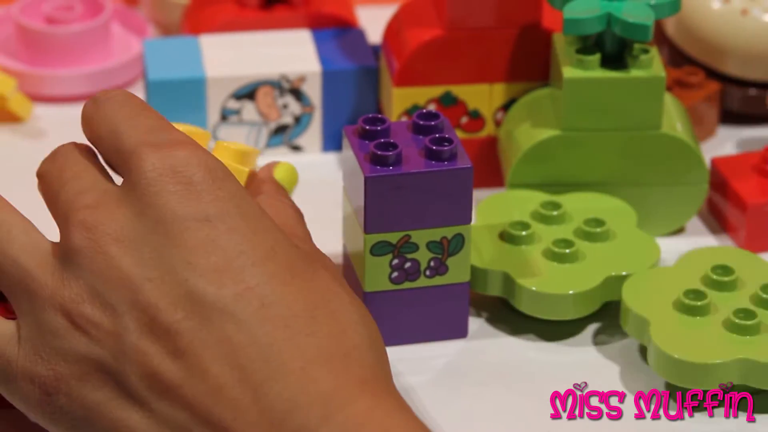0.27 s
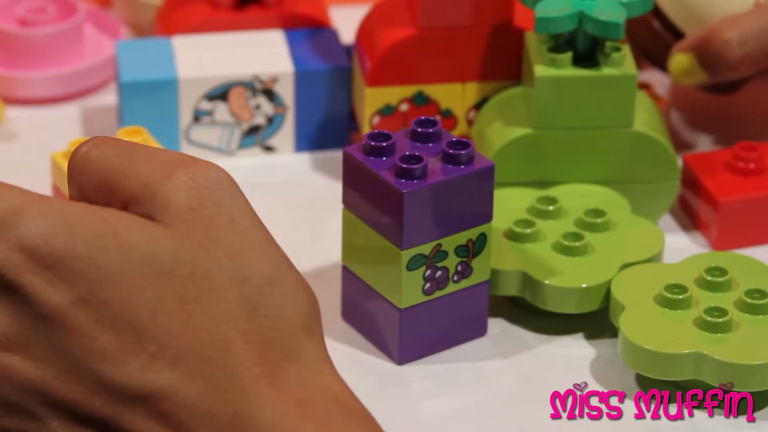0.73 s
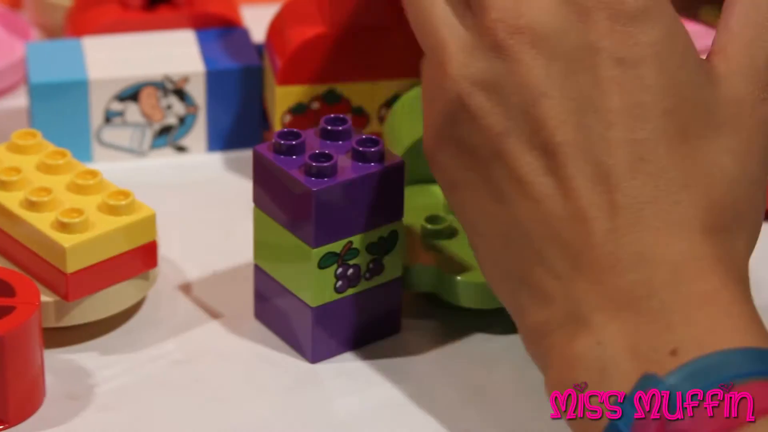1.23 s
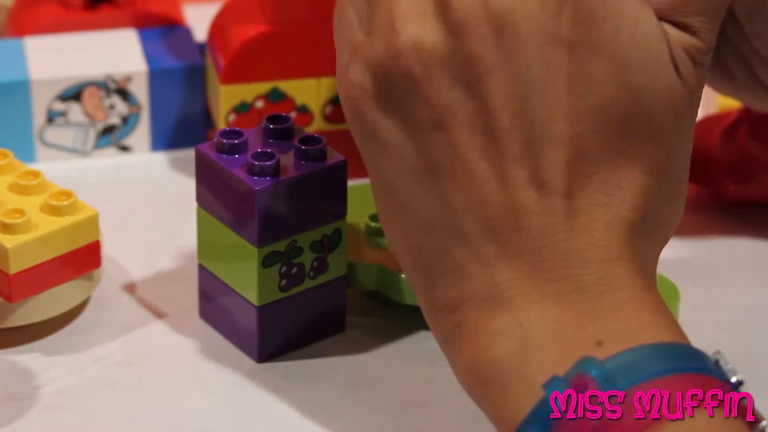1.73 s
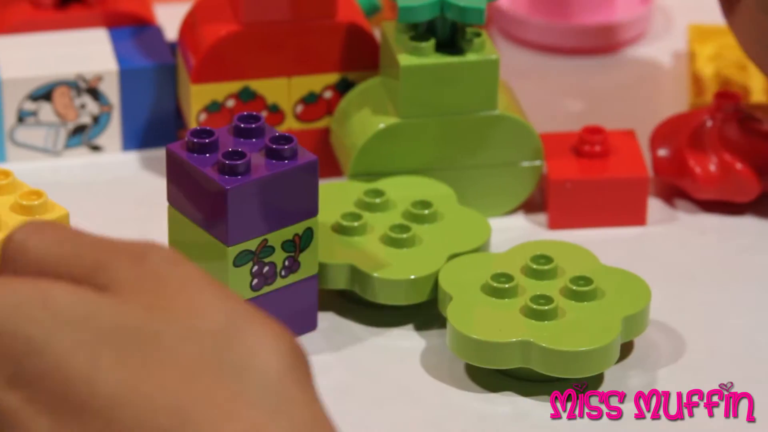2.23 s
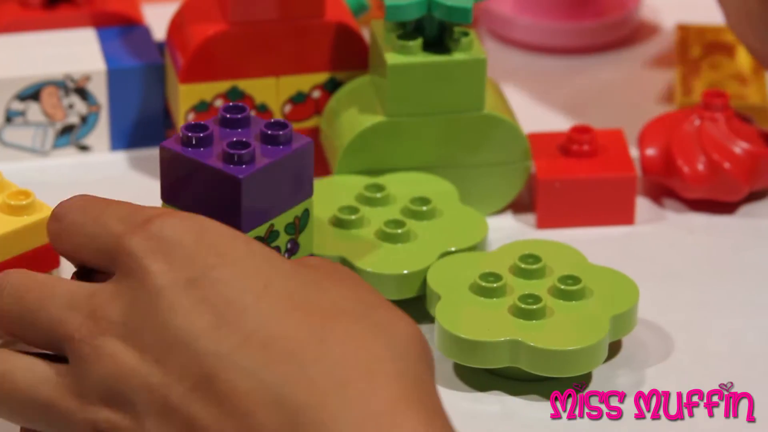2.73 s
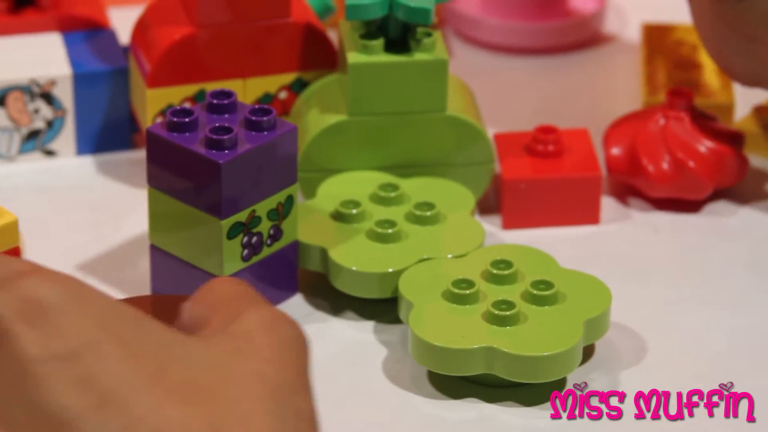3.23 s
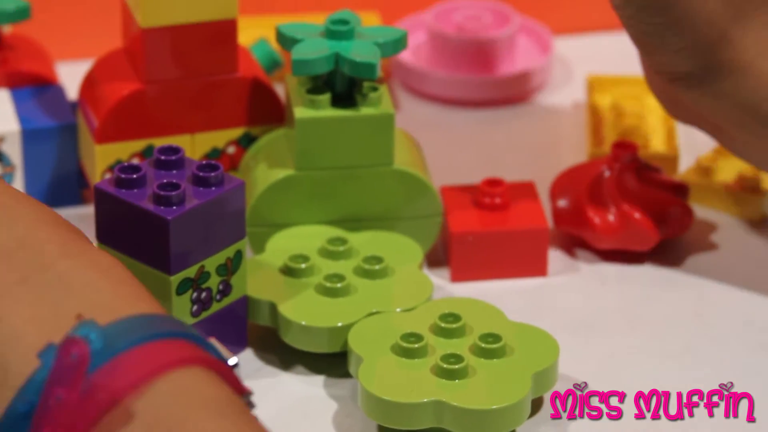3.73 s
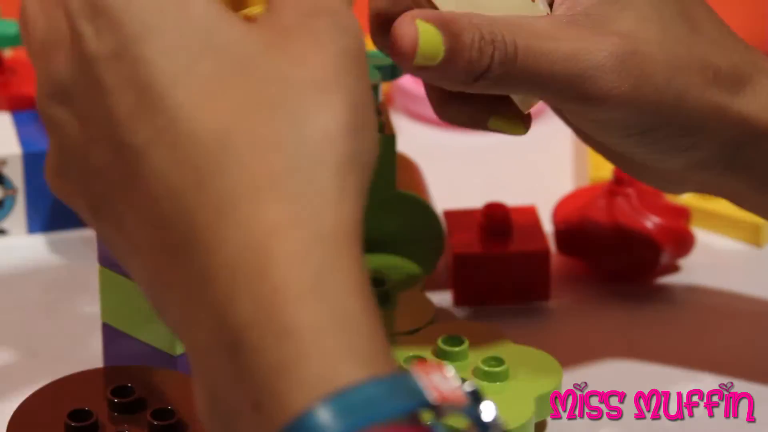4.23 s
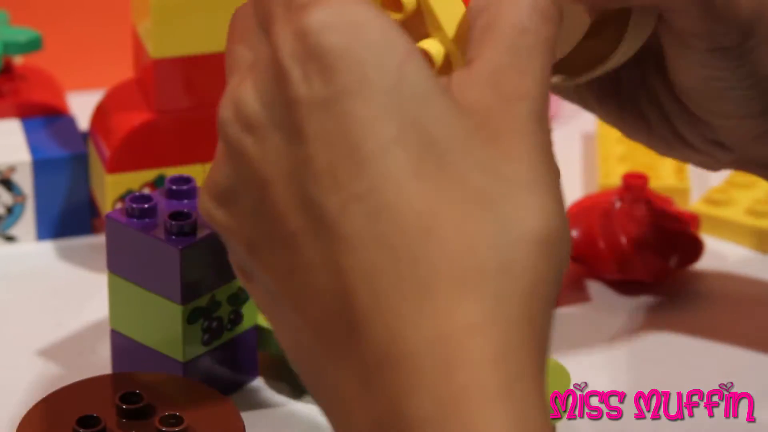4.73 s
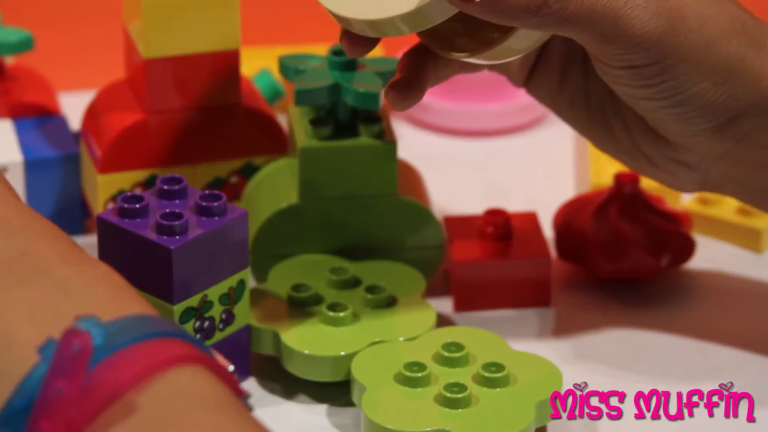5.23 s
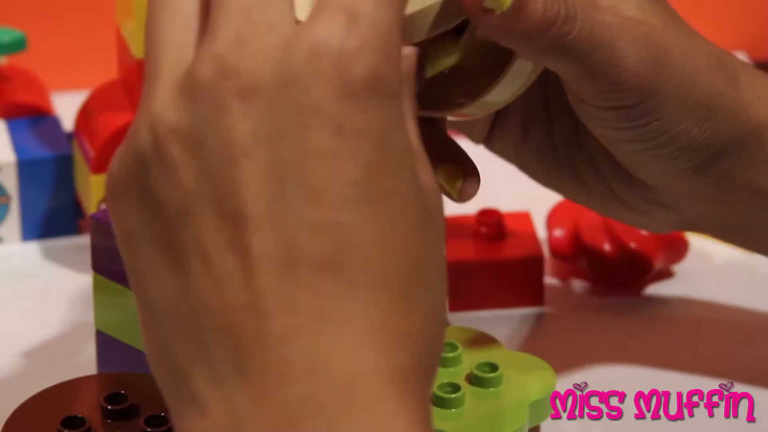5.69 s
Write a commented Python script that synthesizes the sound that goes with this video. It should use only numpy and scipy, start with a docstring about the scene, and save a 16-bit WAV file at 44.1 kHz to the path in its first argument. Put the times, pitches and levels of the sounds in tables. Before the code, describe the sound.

Close to the microphone in a small room, hard plastic toy pieces click and knock on a table. A dense, loud clatter with short scrapes comes first, then a stack is set down, a few isolated brick snaps follow, another burst of flat clicks, quieter fumbling, and finally sharp brick knocks. Low rumble, soft hiss and a very faint high whine continue underneath.

```python
"""Plastic toy pieces on a table, close up

Hands pick up, press together and set down hard plastic pieces close to the microphone, in a small room.
Each knock is a short uneven contact that rings flat plates, hollow bricks, a cup, a stack or the table top.
Sliding pieces are dense random grains through the same bodies; sparse reflections make the room.
Low rumble, microphone hiss and a thin electrical whine lie underneath."""
import sys
import numpy as np
from scipy import signal
from scipy.io import wavfile

SR = 44100
rng = np.random.default_rng(int(sys.argv[2]) if len(sys.argv) > 2 else 0)


def persist_wave(psi):
    """Save psi, clipped to +-1, as 16-bit WAV."""
    counts = np.round(np.clip(psi, -1, 1) * 32767).astype(np.int16)
    wavfile.write(sys.argv[1], SR, np.atleast_2d(counts).T)


N = 262703

# Modes of a flat plate: pitch_hz [Hz], level_db [relative dB], t60_s [s]
PLATE_MODES = [(1772, -3, 0.13), (3000, -1, 0.044), (3300, -2.5, 0.082), (3457, 7.5, 0.032),
               (5563, 0.5, 0.054), (6420, -9.5, 0.068), (11650, 1, 0.031), (12200, -29, .025)]
# Flat plates clicking: start_s [s], crack_db [peak dB], face_hz [Hz, struck face],
# ring_db [peak dB], tick_db [peak dB]
PLATE_CLICKS = [(.0169, -36, 1640, -48, -20.5), (.0574, -29, 1700, -14, -31),
                (.0811, -3.5, 1870, -11, -1.5), (.0931, -14, 1750, -24, -10.5),
                (.1271, -23, 1700, -14.5, -23), (.2458, -19.5, 3800, -23, -22), (.286, -7, 1680, -39, -45),
                (.3154, -23, 1800, -34, -44), (.3284, -30, 5550, -25.5, -30),
                (.4349, -10, 2980, -15.5, -38), (.4577, -30, 5660, -23.5, -29),
                (.4748, -16, 1900, -15.5, -37), (.499, -25, 1750, -30, -27), (.5115, -21.5, 3020, -45, -38),
                (.5465, -17, 3710, -23, -47), (.6626, -22.5, 3130, -28, -24), (.7193, -27, 3160, -33, -30),
                (2.6563, -29, 3140, -29, -35), (2.6728, -11, 3240, -16, -38),
                (2.7066, -20, 3280, -10.5, -19), (2.7304, -9.5, 2000, -9.5, -20.5),
                (2.7523, -17, 1860, -20, -17.5), (2.8087, -22, 1740, -27, -39),
                (2.8494, -28, 1690, -49, -32), (2.8754, -24.5, 1650, -44, -33),
                (2.918, -20.5, 1970, -30, -30), (2.944, -32, 3530, -38, -45),
                (3.0249, -21, 1840, -27, -25.5), (3.0669, -32, 1640, -44, -42),
                (3.8302, -23.5, 3420, -46, -31.5)]


def plate_clicks():
    """Flat plates ring after a short contact and pass part of each knock on to the table."""
    return clicks(PLATE_CLICKS, PLATE_MODES, fall_db=5.0, ring_ms=0.86, firm=6.8, crack_firm=0.28, under_db=-19)


# Modes of a hollow brick: pitch_hz [Hz], level_db [relative dB], t60_s [s]
BRICK_MODES = [(1580, -20, 0.038), (1723, 11, 0.019), (2850, 4, 0.043), (3270, 3.5, 0.012),
               (4310, 3, 0.044), (4850, 2, 0.049), (7440, -7, 0.042)]
# Hollow bricks clicking: start_s [s], crack_db [peak dB], face_hz [Hz, struck face],
# ring_db [peak dB], tick_db [peak dB]
BRICK_CLICKS = [(1.6973, -2.5, 1880, -6.5, -12.5), (1.7004, -7, 4460, -6, -29),
                (1.7758, -2.5, 3070, -22, -42), (1.8233, -28, 5040, -48, -46),
                (2.0214, -26.5, 1500, -59, -56), (3.1792, -30, 1910, -28, -21.5),
                (3.2125, -33, 1480, -48, -26), (3.256, -33, 1600, -55, -39), (3.354, -28, 1490, -37, -32),
                (3.3807, -32, 3180, -32, -30), (3.5981, -40, 2380, -29.5, -48),
                (3.6411, -31, 2400, -36, -47), (4.69, -25, 1890, -39, -24), (4.7106, -7, 2030, -3, -31),
                (4.7711, -11, 4710, -2.5, -6.5), (5.1398, -32, 4900, -31.5, -55),
                (5.3001, -27.5, 2260, -55, -26), (5.3642, -9.5, 3080, -17, -6.5)]


def brick_clicks():
    """Hollow bricks ring after a very brief contact."""
    return shell_clicks(BRICK_CLICKS, BRICK_MODES)


# Modes of a round cup-shaped piece: pitch_hz [Hz], level_db [relative dB], t60_s [s]
CUP_MODES = [(1523, -1, 0.063), (2610, 0, 0.062), (4000, 3, 0.053), (4760, 6, 0.046)]
# The cup clicking: start_s [s], crack_db [peak dB], face_hz [Hz, struck face],
# ring_db [peak dB], tick_db [peak dB]
CUP_CLICKS = [(4.2922, -29, 2620, -20, -11), (4.3867, -19.5, 2860, -26, -29), (4.3971, -15, 3010, -37, -21),
              (4.4526, -21.5, 1490, -36, -47), (5.656, -22, 4550, -29, -30),
              (5.6993, -18, 4200, -22, -11.5), (5.7604, -36, 4660, -33, -41), (5.9189, -35, 2600, -39, -60),
              (5.9544, -26.5, 1800, -47, -48)]


def cup_clicks():
    """A round cup-shaped piece rings at its own few modes."""
    return shell_clicks(CUP_CLICKS, CUP_MODES)


# Modes of a stack of pieces: pitch_hz [Hz], level_db [relative dB], t60_s [s]
STACK_MODES = [(1260, -4, .05), (2230, -2.5, 0.089), (3363, 7.5, .035), (4140, -14, 0.076),
               (4710, 7.5, 0.027), (5700, -3, 0.045), (6050, -10, .03), (6840, -9, 0.033)]
# The stack clicking as it is set down: start_s [s], crack_db [peak dB], face_hz [Hz, struck face],
# ring_db [peak dB], tick_db [peak dB]
STACK_CLICKS = [(1.2517, -35, 3190, -34.5, -45), (1.29, -16, 1290, -20.5, -19),
                (1.3144, -8, 3570, -29, -22), (1.3191, -12.5, 3470, -1.5, -11.5),
                (1.3394, -15, 1240, -19, -40), (1.3962, -40, 3400, -38, -50)]


def stack_clicks():
    """A stack of pieces rings as it is set down."""
    return shell_clicks(STACK_CLICKS, STACK_MODES)


def shell_clicks(rows, modes):
    """Bricks, cup and stack share one very brief contact."""
    return clicks(rows, modes, fall_db=2.9, ring_ms=0.09, firm=4.3, crack_firm=1.2)


# Spectrum of the crack of a struck face: pitch_hz [Hz], level_db [relative dB]
CRACK = [(500, -15), (1000, -4.5), (1600, -1), (2600, -5.5), (4500, -10.5), (7000, -27), (9000, -22.5)]
# Spectrum of the bright tick of a contact: pitch_hz [Hz], level_db [relative dB]
TICK = [(4000, 7.5), (6500, 8), (8500, 3.5), (12000, 10), (15000, 2.5), (16200, 6)]
CRACK_MS, TICK_MS, THUD_MS = 1.98, 1.26, 1.33  # fade time constants of the contacts
UNDER_HZ = 930  # pitch of the table spot that a clicking plate nudges


def clicks(rows, modes, fall_db, ring_ms, firm, crack_firm, under_db=-np.inf):
    """Each click cracks on the struck face, rings the piece and ticks; under_db lets it nudge the table."""
    out, tick, under = np.zeros(N), colour(TICK), thud_body(UNDER_HZ)
    chatters = rng.standard_normal((len(rows), 4, 900))
    for (start_s, crack_db, face_hz, ring_db, tick_db), (a, b, c, d) in zip(rows, chatters):
        # the crack loses 3.3 dB per octave away from the face's pitch
        near_face = [(hz, db - 3.3 * abs(np.log2(hz / face_hz))) for hz, db in CRACK]
        crack = peaked(colour(near_face))
        # the struck wall is damped by the fingers
        face = crack + 0.71 * ring([(face_hz, 0, .01)])[:len(crack)]
        parts = [
            (contact(a, CRACK_MS, 0.25, crack_firm), face, crack_db),
            (contact(b, ring_ms, 0.9, firm), ring(modes, face_hz, fall_db), ring_db),
            (contact(c, TICK_MS, 1.0, 0.13), tick, tick_db),
            (contact(d, THUD_MS, 3.3, 1.0), under, crack_db + under_db)]
        for push, body, peak_db in parts:
            add(out, start_s, gain_of(peak_db) * peaked(signal.fftconvolve(push, body)))
    return out


# The table top thudding under a piece: start_s [s], level_db [peak dB], pitch_hz [Hz, struck spot]
THUDS = [(.0169, -24, 950), (.0574, -29, 640), (.0931, -13, 630), (.1271, -31, 649), (.1616, -13.5, 453),
         (.2458, -13.5, 710), (.286, 3, 906), (.3154, -10.5, 1050), (.4349, -16.5, 1070),
         (.5115, -19.5, 690), (.635, -31.5, 695), (.6626, -8.5, 590), (.7193, -5.5, 610),
         (1.2517, -24, 464), (1.29, -27, 235), (1.3191, -20, 1090), (1.3394, -19.5, 234),
         (1.3962, -17.5, 690), (2.6728, -20.5, 735), (2.7066, -22.5, 1210), (2.7304, -21, 1130),
         (3.1792, -23, 850), (3.3108, -25.5, 334), (3.354, -30.5, 760), (3.3807, -34, 876),
         (3.4018, -31, 790), (3.5981, -20, 434), (3.6411, -14.5, 436), (3.7536, -22.5, 367),
         (3.7712, -30, 218), (3.8302, -20.5, 445), (4.2922, -30, 380), (4.3867, -31, 840),
         (4.4526, -34, 940), (4.7106, -12.5, 815), (4.7711, -14.5, 633), (5.3001, -15.5, 960),
         (5.3642, -1.5, 897), (5.9544, -29, 640)]


def table_thuds():
    """A piece lands and the table top answers at the struck spot."""
    out = np.zeros(N)
    for (start_s, peak_db, spot_hz), chatter in zip(THUDS, rng.standard_normal((len(THUDS), 3000))):
        push = contact(chatter, THUD_MS, 1.61, 6.8)
        add(out, start_s, gain_of(peak_db) * peaked(signal.fftconvolve(push, thud_body(spot_hz))))
    return out


def loose_shudders():
    """With each thud, loose pieces shake on the table: a longer chatter through three short modes."""
    shudder_ms, shudder_db = 9.2, -16  # fade time constant; peak against the thud
    out = np.zeros(N)
    for (start_s, peak_db, spot_hz), chatter in zip(THUDS, rng.standard_normal((len(THUDS), 3000))):
        loose = ring([(0.57 * spot_hz, -3, .012), (1.09 * spot_hz, 0, .008), (1.9 * spot_hz, -5, .005)])
        push = contact(chatter, shudder_ms, 0.63, 0)
        add(out, start_s, gain_of(peak_db + shudder_db) * peaked(signal.fftconvolve(push, loose)))
    return out


# Modes of the table top: pitch_hz [Hz], level_db [relative dB], t60_s [s]
TABLE_MODES = [(214.5, 3, 0.094), (230.3, -7.5, 0.2), (316.6, -18.5, 0.51), (467, -3.5, 0.1),
               (530, 8, 0.027), (664, 12.5, 0.18), (726, 18, 0.051), (856, 26, 0.02), (962, 8, 0.073),
               (1030, 2, 0.12)]


def thud_body(spot_hz):
    """The table top, with a short dull pair of modes at the struck spot."""
    dull_pair = ring([(spot_hz, 0, .025), (1.19 * spot_hz, -3, .02)])
    return ring(TABLE_MODES, spot_hz, 26.0) + 1.34 * dull_pair


# Studs and edges scraping, as modes: pitch_hz [Hz], level_db [relative dB], t60_s [s]
SCRAPE_MODES = [(9500, 1, 0.00077), (10800, 2, 0.0017), (12200, -2, 0.0017), (13400, -15, 0.0039)]
# Plastic rubbing on plastic: start_s [s], length_s [s], pitch_hz [Hz, rubbed face],
# plastic_db [dB], scrape_db [dB]
RUBS = [(0, 0.051, 1770, -26, -49), (0.107, 0.082, 3670, -35.5, -49), (0.404, 0.057, 3320, -35.5, -53),
        (0.458, 0.081, 3300, -39.5, -51), (0.651, 0.028, 3320, -37, -49), (1.253, 0.042, 3300, -48, -55),
        (1.458, 0.049, 1950, -41, -53), (1.506, 0.04, 3340, -43.5, -65), (1.652, 0.042, 3400, -41.5, -54),
        (2.073, 0.97, 3550, -63, -61.5), (2.656, 0.067, 2650, -38, -45), (2.76, 0.079, 1820, -35.5, -51),
        (2.864, 0.1, 1657, -46, -52), (3.125, 0.05, 3100, -49.5, -48), (3.157, 0.041, 3130, -41.5, -41),
        (3.188, 0.054, 1450, -39.5, -47), (3.562, 0.039, 2470, -41.5, -47), (3.612, 0.058, 3200, -42, -50),
        (3.674, 0.072, 3160, -47.5, -57), (3.724, 0.072, 2580, -48, -51.5), (4.265, 0.13, 2610, -48, -51),
        (4.683, 0.015, 2000, -27.5, -43), (4.745, 0.017, 2830, -37, -60), (5.735, 0.56, 2600, -50.5, -58)]


def plastic_rubs():
    """Plastic sticks and slips on plastic: grains drive the rubbed face and, apart, a fine scrape."""
    out, scrape = np.zeros(N), ring(SCRAPE_MODES)
    face_grains, scrape_grains = slip_grains(), slip_grains()
    rasp = peaked(colour(CRACK))
    rasp = np.pad(rasp, (0, len(scrape) - len(rasp)))
    for start_s, length_s, face_hz, plastic_db, scrape_db in RUBS:
        face = 0.85 * ring([(face_hz, 0, .012)])
        pieces = 0.61 * ring(PLATE_MODES + BRICK_MODES, face_hz, 6.3)
        stroke(out, face_grains, start_s, length_s, face + pieces + 0.89 * rasp, plastic_db)
        stroke(out, scrape_grains, start_s, length_s, scrape, scrape_db)
    return out


# Pieces dragged over the table: start_s [s], length_s [s], level_db [dB]
DRAGS = [(0, 0.046, -33.5), (0.095, 0.14, -36), (0.385, 0.02, -43), (0.491, 0.06, -33.5),
         (0.648, 0.037, -22), (1.263, 0.044, -37), (1.292, 0.11, -33.5), (2.754, 0.053, -36),
         (3.311, 0.02, -37.5), (3.601, 0.084, -39.5), (3.714, 0.11, -40)]


def table_drags():
    """Pieces stick and slip over the table top, a dull scrape spread over about 200 to 860 Hz."""
    out, grains, table = np.zeros(N), slip_grains(), ring(TABLE_MODES, 343, 31.0)
    for start_s, length_s, level_db in DRAGS:
        stroke(out, grains, start_s, length_s, table, level_db)
    return out


def slip_grains():
    """Dense uneven slips: about three samples in ten carry a random push."""
    strength = gain_of(2.8 * rng.exponential(1, N))
    return strength * rng.standard_normal(N) * (rng.random(N) < .3)


def stroke(mix, grains, start_s, length_s, body, level_db):
    """One slide: grains fade in and out and drive a body of unit energy."""
    shape = signal.windows.tukey(round(length_s * SR), .6)
    slip = grains[round(start_s * SR):][:len(shape)]
    drive = evened(slip) * shape[:len(slip)]
    add(mix, start_s, gain_of(level_db) * signal.fftconvolve(drive, body / np.linalg.norm(body)))


def contact(chatter, fade_ms, swell, firm):
    """A short chatter of force that swells and fades; firm adds a hard touch near its start."""
    u = np.arange(len(chatter)) / SR * 1000 / fade_ms
    force = chatter * u ** swell * np.exp(-u)
    force[2] += firm
    return force


def ring(modes, near_hz=None, fall_db=0):
    """An object's dying sines; a touched spot weakens modes by fall_db per octave from its pitch."""
    t = np.arange(5000) / SR
    hz, db, t60_s = np.transpose(modes)[:, :, None]
    if near_hz:
        db = db - fall_db * abs(np.log2(hz / near_hz))
    sines = gain_of(db - 60 * t / t60_s) * np.sin(2 * np.pi * hz * t)
    return peaked(sines.sum(0))


def colour(points, size=1024):
    """Causal (minimum-phase) impulse response with a given spectrum."""
    log_gain = np.log(gain_of(read(points, abs(np.fft.fftfreq(size, 1 / SR)))))
    spectrum = np.exp(np.conj(signal.hilbert(log_gain)))
    return np.fft.ifft(spectrum).real[:size // 2]


# Reverberation of the small room: pitch_hz [Hz], t60_s [s]
ROOM = [(250, 0.85), (700, 0.6), (1800, 0.67), (3000, 0.75), (5000, 0.62), (12000, 0.12)]


def room(x):
    """Sparse reflections of random sign: strong near ones off the table clutter, then walls, by band."""
    taps = np.zeros(SR // 2)
    slots = np.arange(120, SR // 2 - 20, 20)
    at = slots + rng.integers(0, 20, len(slots))
    taps[at] = rng.choice([-1., 1.], len(at))
    hz, t, z = signal.stft(taps, SR, nperseg=256)
    walls = gain_of(-60 * t / read(ROOM, hz)[:, None])
    clutter = 2.56 * gain_of(-t / 0.0013)  # falls 1 dB every 1.3 ms
    tail = signal.istft(z * (walls + clutter), SR, nperseg=256)[1]
    return signal.fftconvolve(x, tail / np.linalg.norm(tail))[:N]


# Spectrum of rumble and hiss: pitch_hz [Hz], level_db [relative dB per Hz]
AIR = [(15, -56), (32, -6.5), (42, 1.5), (49, 8), (56, -5.5), (72, -3), (100, -9.5), (120, -10.5),
       (146, -17.5), (480, -23.5), (1100, -27), (2000, -32.5), (4300, -35), (8000, -36.5), (15700, -37.5),
       (16100, -70)]
# Stereo spread of the air: pitch_hz [Hz], level_db [dB, left-right difference against the sum]
APART = [(60, -29), (180, -22.5), (550, -14.5), (1650, -14.5), (4970, -6), (15000, -3)]


def air():
    """Steady stereo rumble and microphone hiss from random short-time spectra, at -39.5 dB RMS."""
    frames, hz = N // 2048 + 5, np.fft.rfftfreq(8192, 1 / SR)
    a, b, c, d = rng.standard_normal((frames, len(hz), 4)).T
    both = a + 1j * b
    apart = (c + 1j * d) * gain_of(read(APART, hz))[:, None]
    z = np.array([both + apart, both - apart]) * gain_of(read(AIR, hz)[:, None])
    noise = signal.istft(z, nperseg=8192, noverlap=6144)[1][:, :N]
    return gain_of(-39.5) * evened(noise)


# Thin electrical whine, steady sines: pitch_hz [Hz], level_db [RMS dB]
WHINE = [(15315, -73), (15375, -64), (15434, -65), (15493, -73)]


def whine():
    """A thin electrical whine: steady close-set high sines that beat together, each at a random phase."""
    t = np.arange(N) / SR
    return sum(gain_of(db) * np.sqrt(2) * np.sin(2 * np.pi * (hz * t + rng.random())) for hz, db in WHINE)


def gain_of(db):
    """Amplitude factor of a level in dB."""
    return 10 ** (np.asarray(db) / 20)


def evened(x):
    """Scale to unit RMS."""
    return x / np.sqrt(np.mean(x ** 2) + 1e-20)


def peaked(x):
    """Scale to unit peak."""
    return x / (abs(x).max() + 1e-20)


def read(points, hz):
    """Read a table of (Hz, value) along a logarithmic pitch axis."""
    f, value = np.transpose(points)
    return np.interp(np.log(hz + 1), np.log(f + 1), value)


def add(mix, start_s, sound):
    """Lay a sound into the mix, cut at its end."""
    part = mix[round(start_s * SR):][:len(sound)]
    part += sound[:len(part)]


def scene():
    """Knocks, slides and whine in the middle, the room's answer 9.5 dB down, stereo air around them."""
    knocks = plate_clicks() + brick_clicks() + cup_clicks() + stack_clicks() + table_thuds() + loose_shudders()
    slides = plastic_rubs() + table_drags()
    low_cut = signal.butter(4, 200, "high", fs=SR, output="sos")  # small things radiate no bass
    toys = signal.sosfilt(low_cut, knocks + slides)
    return toys + gain_of(-9.5) * room(toys) + air() + whine()


EDGE_HZ = 16450  # upper band limit


def record(dry):
    """A small steady offset, overload clipped at full scale, then a steep upper band limit."""
    clipped = np.clip(dry - .012, -1, 1)
    band = signal.firwin(1023, EDGE_HZ, window=("kaiser", 11), fs=SR)
    return signal.oaconvolve(clipped, band[None], "same")


dry = scene()
out = record(dry)
persist_wave(out)
```